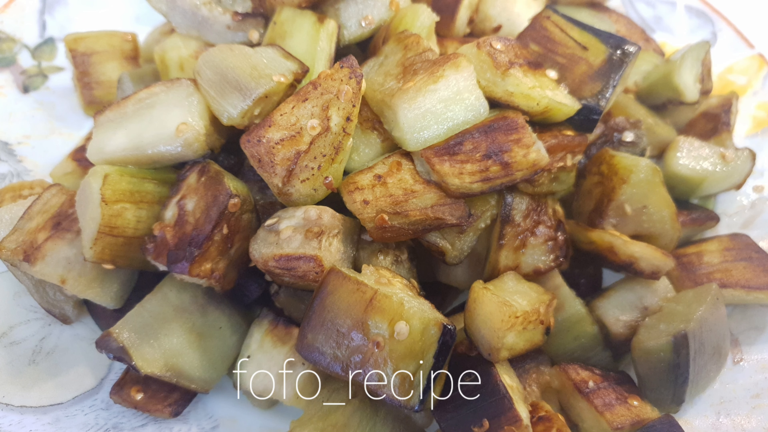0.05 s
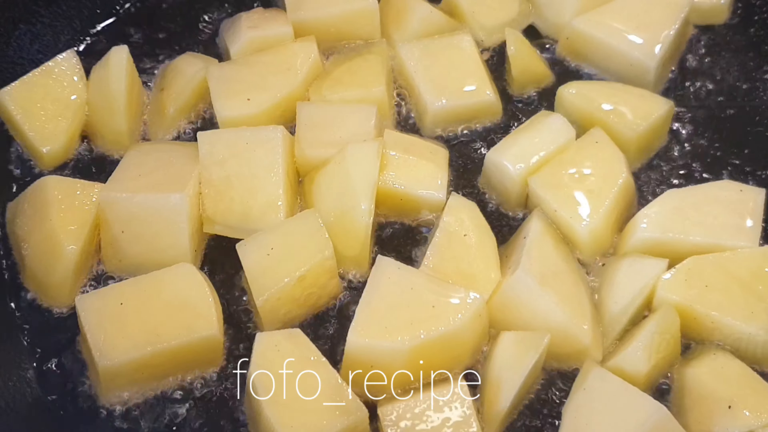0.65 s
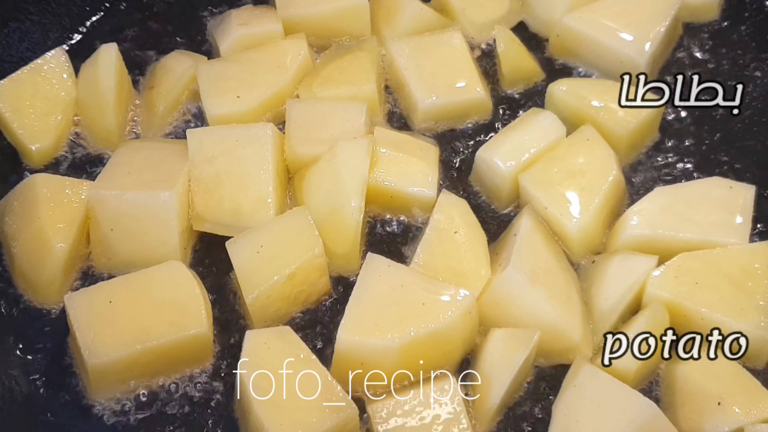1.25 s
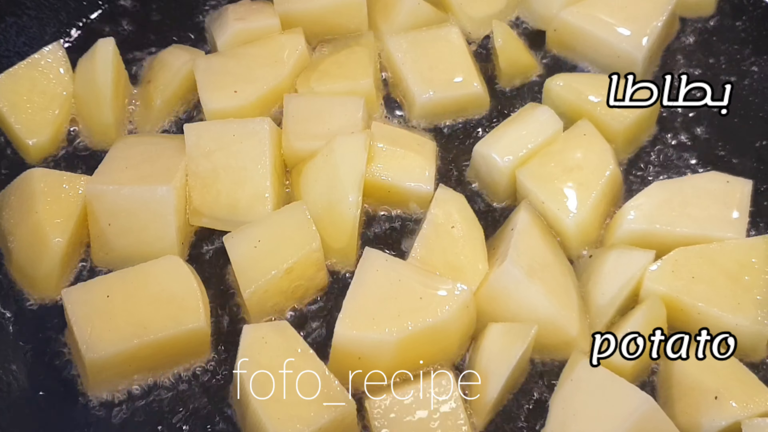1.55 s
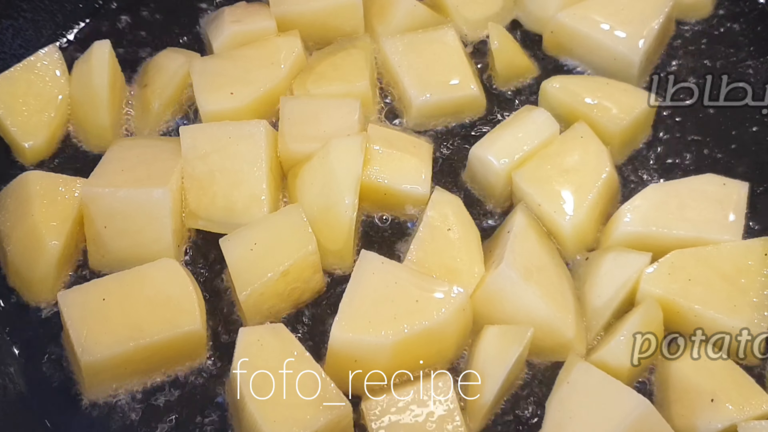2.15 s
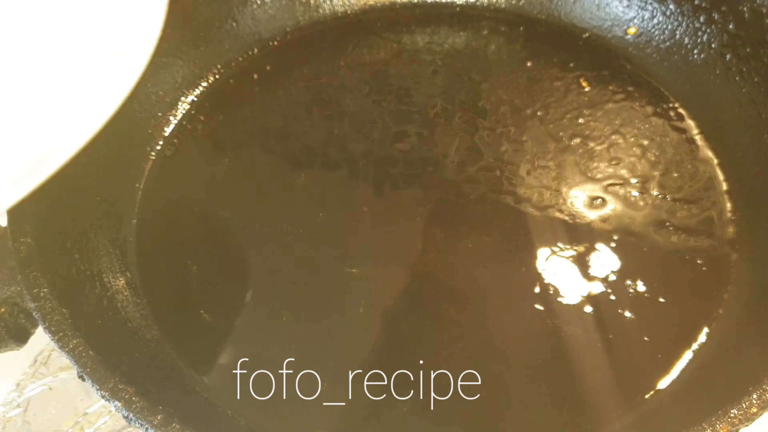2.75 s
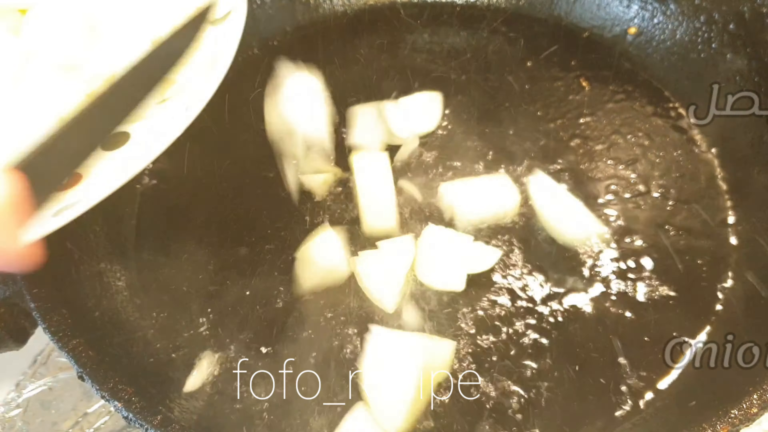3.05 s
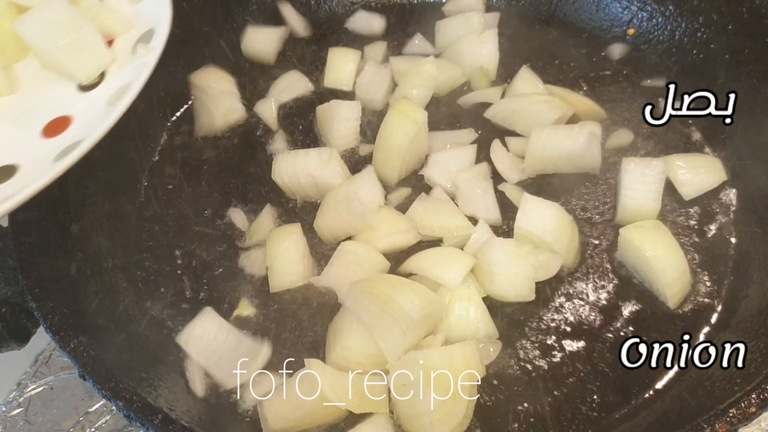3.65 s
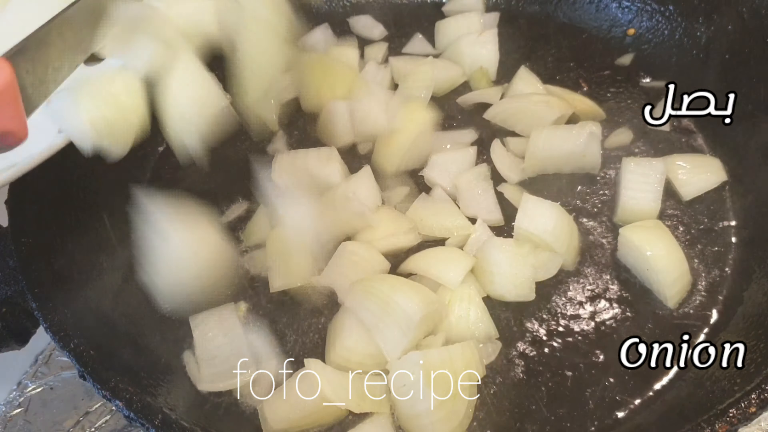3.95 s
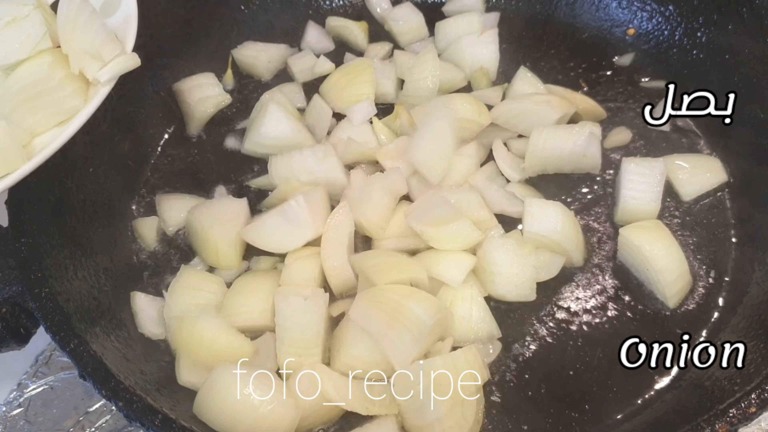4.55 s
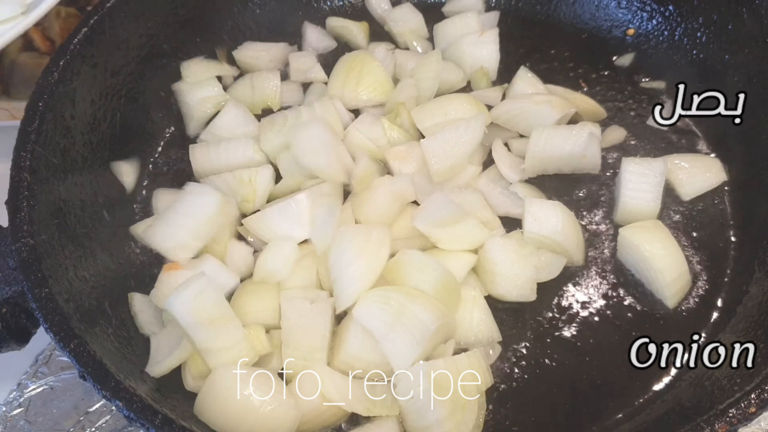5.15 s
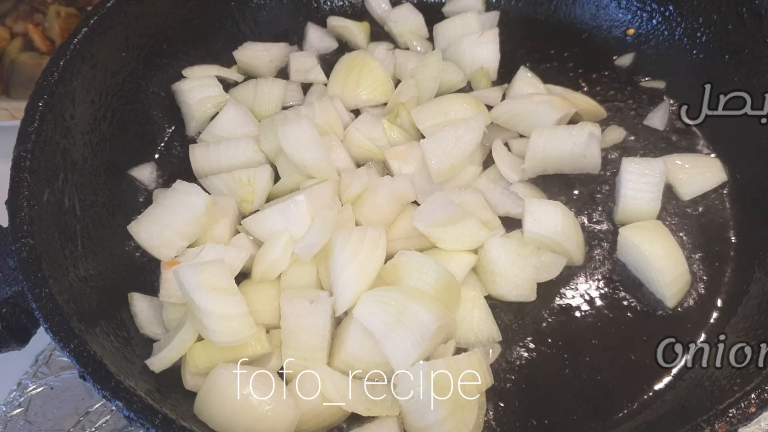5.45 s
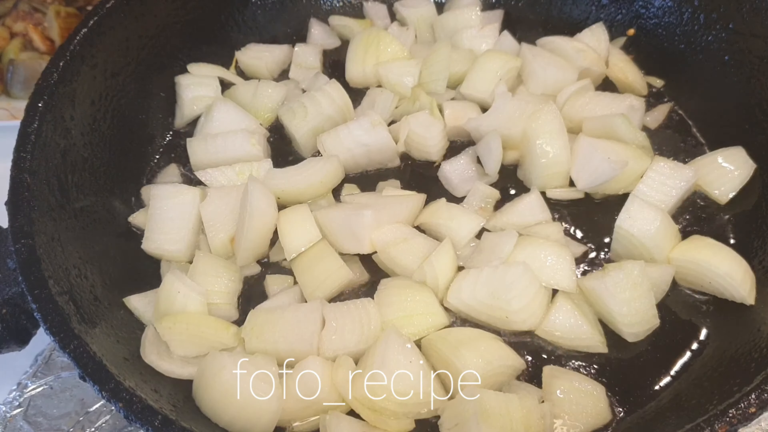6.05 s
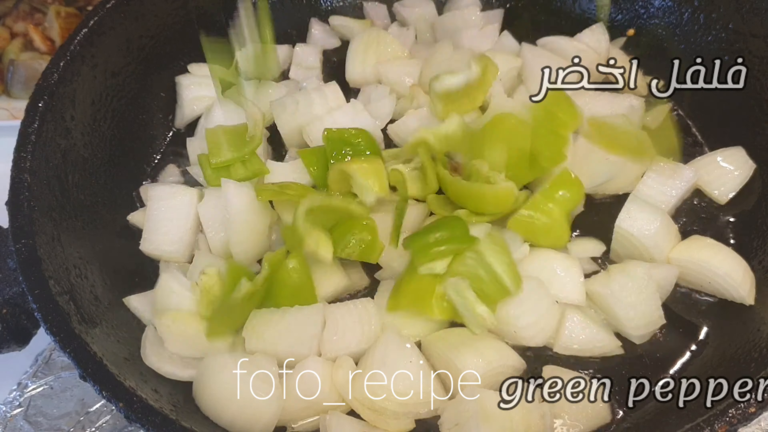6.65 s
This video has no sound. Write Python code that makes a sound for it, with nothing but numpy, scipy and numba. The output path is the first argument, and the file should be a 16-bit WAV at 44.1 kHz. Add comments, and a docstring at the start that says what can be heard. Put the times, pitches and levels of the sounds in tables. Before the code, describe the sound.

Oil crackles around potatoes over a rumbling gas burner, then flares as onions drop in, a knife taps a plate, and peppers follow.

```python
"""A frying pan on a gas stove in a small kitchen, in three abruptly cut scenes. From 0.7 s potato cubes
fizz in oil: tiny steam bubbles burst and water drops spit over the rumbling burner. From 2.8 s onions
land in the hot oil in batches, flaring and knocking; soft low thumps sound, and a knife clinks and
scrapes on the plate. From 6 s the onions fry evenly, then green peppers add a small flare."""
import sys
import numpy as np
from scipy import signal
from scipy.fft import rfft, irfft
from scipy.io import wavfile
from numba import njit

SR = 44100
rng = np.random.default_rng(int(sys.argv[2]) if len(sys.argv) > 2 else 0)


def to_wav(sig):
    """Store sig (one row per channel, or 1-D mono) as 16-bit WAV at the path in sys.argv[1].

    Samples outside -1..1 are clipped; the rate is SR.
    """
    pcm = np.clip(np.atleast_2d(sig), -1, 1) * 32767
    pcm = np.round(pcm).astype(np.int16)
    wavfile.write(sys.argv[1], SR, pcm.T)  # frames by channels


N = 304290
T = np.arange(N) / SR
FREQS_HZ = np.fft.rfftfreq(N, 1 / SR) + 1e-3

# Spectra of the hiss, the bubbles, the burner and the blade. Each row: frequency in Hz, gain in dB.
HISS_EQ = [(60, 0), (400, -4), (1000, -20), (15000, -18)]
POTATO_CRACKLE_EQ = [(700, -20), (1800, -8.5), (3400, -3), (4600, -6.5), (5700, -8), (7000, -2),
                     (8500, -7.5), (10200, -5.5), (11700, -1), (13500, -2), (15500, -9.5)]
NEAR_FIZZ_EQ = [(6000, -60), (10000, -8.5), (11700, -1.5), (13500, -2), (15500, -8)]
VEGETABLE_BOIL_EQ = [(400, -18), (1000, -11), (2200, -9.5), (3000, -4.5), (4200, -2), (5500, -2.5),
                     (7300, 1.5), (8800, -3), (10900, 0.5), (13000, -2.5), (15500, -5)]
POTATO_FLAME_EQ = [(30, -31), (58, -32), (85, -10), (125, -7.5), (205, -4), (255, -5.5), (305, -18.5),
                   (420, -11.5), (520, -10.5), (680, -14.5), (1200, -13.5), (1500, -14), (1900, -25),
                   (4000, -23)]
RUMBLE_EQ = [(20, -14), (60, -2.5), (130, 1.5), (220, -3.5), (320, -5.5), (520, -5.5), (800, -13),
             (1400, -18), (2200, -18.5), (4000, -41)]
BLADE_EQ = [(300, -2), (900, 2), (2800, 11), (3750, 18.5), (5000, 12), (9000, -9), (15000, -24.5)]
# Resonances between burner and pan. Each row: frequency in Hz, width in Hz, lift in dB.
BURNER_GAP_MODES = [(231.7, 20.5, 10.5), (353, 26, 8), (427, 21, 7.5), (509.6, 34, 8.5), (643, 20, 8.5),
                    (730, 13, 8), (857, 43, 5), (1098, 31, 8.5)]
# Loudest bubbles by the potatoes. Each row: start in seconds, level in dB, pitch in Hz.
BUBBLE_SNAPS = [(0.7986, -28, 11700), (1.1084, -22, 12700), (1.3823, -21, 13200), (1.8064, -18, 12900),
                (1.834, -17, 11400), (1.9066, -16, 11800), (1.9305, -21, 11500), (2.1889, -21, 12400),
                (2.3441, -25, 7040), (2.372, -24, 11500), (2.3984, -23, 12100), (2.422, -19, 12500),
                (2.5331, -19, 12300), (2.5676, -15.5, 11800)]
# Loudest water drops. Each row: start in seconds, level in dB, pitch in Hz.
DROP_SPITS = [(1.011, -23, 3200), (1.307, -24, 3120), (1.384, -26.5, 3000), (1.851, -19.5, 2500),
              (1.865, -19.5, 4020), (2.072, -19, 3800), (2.367, -19.5, 3500), (2.445, -20, 4200),
              (2.564, -19.5, 3040), (3.144, -10.5, 9500), (3.207, -11.5, 2600), (3.224, -13.5, 3480),
              (3.229, -17, 3000), (3.367, -15.5, 4000), (3.531, -16, 4000), (3.95, -22.5, 10700),
              (4.146, -20.5, 4020), (5.226, -16.5, 4050), (5.555, -20, 4000), (5.575, -16, 4200),
              (6.032, -17, 6550), (6.163, -19, 5000), (6.783, -17, 9000)]
# Batches entering the oil. Each row: start in seconds, landing time in seconds, flare in dB, boil in dB.
ONION_LANDINGS = [(2.985, .06, -27, -43), (3.47, 0.13, -29.5, -36.5), (4.05, 0.07, -41, -42),
                  (5.05, 0.22, -35, -44)]
PEPPER_LANDINGS = [(6.47, 0.05, -39, -54)]
# Low rumble that ducks as the sizzle flares, then slowly recovers. Each row: time in seconds, level in dB.
RUMBLE_LEVELS = [(2.98, -37.5), (3.15, -45), (3.9, -49), (4.8, -48.5), (6.0, -45)]
# Soft low thumps. Each row: start in seconds, level in dB, pitch in Hz, left minus right in dB.
LOW_THUMPS = [(3.095, -32, 69, 11), (3.239, -30, 70, 2), (3.355, -26.5, 110, -18), (3.74, -23.5, 55.6, -30),
              (4.437, -35, 54.6, 10), (5.309, -28, 129, -16), (5.62, -32.5, 49.4, -15)]
# Onion hitting the pan. Each row: start in seconds, peak in dB, left minus right in dB.
ONION_KNOCKS = [(3.241, -25, 1), (3.738, -18, -11), (4.533, -21, 6), (5.033, -21, 2), (5.0711, -12.5, 1)]
# Modes of a knock and of the plate. Each row: frequency in Hz, relative level in dB, t60 in seconds.
TICK_MODES = [(870, -30, 0.011), (1300, 1, .009), (1670, 2, .008), (3100, -12, 0.0025), (4700, 5.5, 0.0047),
              (6560, 10.5, 0.0048)]
PLATE_MODES = [(1750, -5.5, .16), (2939, 2, .1), (3750, -13, .06), (5534, -3, .06)]
# Knife on plate. Each row: start in seconds, ring gain in dB, scrape gain in dB, rim place in radians.
KNIFE_STROKES = [(4.34, -44, -52, .6), (4.705, -35.5, -48, .7), (4.937, -27, -39, .68),
                 (5.3205, -26.5, -39, .28), (5.365, -39, -45, .3), (5.62, -46, -33, 1),
                 (5.642, -48, -39, 1)]


def undb(db):
    """Decibels to gain."""
    return 10 ** (np.asarray(db) / 20)


def unit(x):
    """Scale a stereo pair to a centre rms of 1."""
    return x / np.std(x.mean(0))


def pan(db):
    """Stereo gains with mean 1 for a left minus right level."""
    gains = undb(np.array([[db], [-db]]) / 2)
    return gains / gains.mean()


def colour(x, points, modes=()):
    """Filter by an outline plus resonances; 12 dB per octave roll-off below the first point."""
    hz, db = np.transpose(points)
    shape_db = np.interp(np.log(FREQS_HZ), np.log(hz), db)
    shape_db -= 12 * np.maximum(np.log2(hz[0] / FREQS_HZ), 0)
    for centre_hz, width_hz, lift_db in modes:
        shape_db += lift_db / (1 + (2 * (FREQS_HZ - centre_hz) / width_hz) ** 2)
    return irfft(rfft(x) * undb(shape_db), N)


def add(out, start_s, sound):
    """Mix in a short sound."""
    i = int(start_s * SR)
    out[:, i:i + sound.shape[-1]] += sound[..., :N - i]


def fade(t, t60_s):
    """Exponential decay."""
    return np.exp(-np.log(1000) * t / t60_s)


def walk(rate_hz):
    """Random wander, spread near 1."""
    knots = rng.standard_normal(1024)
    return np.interp(T * rate_hz, np.arange(len(knots)), knots)


def ramp(start_s, length_s):
    """Linear rise from 0 to 1."""
    return np.clip((T - start_s) / length_s, 0, 1)


def cut(start_s, end_s, open_at_s, opening_s, muted_db):
    """Scene gate: starts muted, opens, shuts abruptly."""
    running = np.clip(np.minimum((T - start_s) / .004, (end_s - T) / .008), 0, 1)
    return running * np.interp(T, [open_at_s, open_at_s + opening_s], [undb(muted_db), 1])


def hiss(start_s=.652, level_db=-76.5):
    """Very faint, dull hiss under all scenes."""
    return unit(colour(rng.standard_normal((2, N)), HISS_EQ)) * undb(level_db) * (T > start_s)


@njit
def bursts(start_samples, hz, tau_samples, size):
    """One damped sine per bubble, of unit energy before scaling by size."""
    out = np.zeros(N)
    for k, start in enumerate(start_samples):
        pole = np.exp(2j * np.pi * hz[k] / SR - 1 / tau_samples[k])
        phasor = 2 * size[k] / np.sqrt(tau_samples[k]) + 0j
        for i in range(max(int(start), 0), min(int(start + 6 * tau_samples[k]) + 2, N)):
            out[i] += phasor.imag
            phasor *= pole
    return out


def bubbles(per_s, spread_db, cycles, pan_db, pan_spread_db, ceiling_db):
    """Steam bubbles burst all over the pan: many small, few large, each with its own pitch and place."""
    draws = np.random.default_rng(rng.integers(2 ** 31)).random((int(per_s * N / SR), 6))
    when, pitch, strength, damping, place, side = draws.T
    hz = 500 + 15500 * pitch
    tau_samples = cycles * (.4 - .82 * np.log(1 - damping)) * SR / hz  # most click, a few sing
    size = undb(np.minimum(-spread_db * np.log(1 - strength), ceiling_db))
    lag_samples = 24 * (place - .5)
    lean_db = pan_db + pan_spread_db * (2 * side - 1)
    ears = [bursts(when * N + ear * lag_samples, hz, tau_samples, size * undb(ear * lean_db / 2))
            for ear in (1, -1)]
    return unit(np.array(ears))


def scatter(x, wet_db, t60_s):
    """Each bubble has its own echoes; together they form a hiss trailing the crackle."""
    pole = np.exp(-np.log(1e6) / (t60_s * SR))
    energy = signal.lfilter([1 - pole], [1, -pole], x ** 2)
    return x + undb(wet_db) * np.sqrt(energy) * rng.standard_normal((2, N))


def burner(points, modes, width_hz, flutter_db, pan_db):
    """Turbulent gas flame: low notes are centred, the deepest draughts and the highs are wide."""
    mid, side = rng.standard_normal((2, N))
    side_gain = np.clip(.052 + FREQS_HZ / width_hz + (38 / FREQS_HZ) ** 2, 0, 1)
    side = irfft(rfft(side) * side_gain, N)
    flame = colour(np.array([mid + side, mid - side]), points, modes)
    return unit(flame * pan(pan_db)) * undb(flutter_db * walk(6.94))


def pop(hz, pan_db, cycles=.83):
    """A water drop bursts in oil: brief cavity ring, sharp crack, splutter of droplets."""
    t = T[:SR // 25]
    cavity = np.sin(2 * np.pi * hz * t) * np.exp(-t * hz / cycles)
    crack, splutter = .83 * fade(t, .0087), .31 * fade(t, .037)
    spray = rng.standard_normal((2, len(t))) * (crack + splutter)
    band = signal.butter(1, [hz / 3, min(2 * hz, .4 * SR)], "band", fs=SR)
    sound = cavity + signal.lfilter(*band, spray)
    return sound / np.abs(sound).max() * pan(pan_db)


def strays(per_s, peak_db, spread_db=3.5, centre_hz=5000, spread_octaves=.59, pan_spread_db=5.5):
    """Small drops spit at random; peak_db is relative to a sizzle of rms 1."""
    out = np.zeros((2, N))
    draws = np.random.default_rng(rng.integers(2 ** 31)).uniform(-1, 1, (int(per_s * N / SR), 4))
    for when, size, pitch, side in draws:
        drop = pop(centre_hz * 2 ** (spread_octaves * pitch), pan_spread_db * side)
        add(out, (when + 1) / 2 * N / SR, undb(peak_db + spread_db * size) * drop)
    return out


def potatoes():
    """Sparse crackle and fine fizz from the nearest cubes over a strong flame; the levels rise once."""
    sizzle_db = -40.5 + 3 * ramp(start_s=2.03, length_s=.36)
    flame_db = -43 + 4 * ramp(start_s=1.4, length_s=.6)
    crackle = bubbles(per_s=4000, spread_db=4.8, cycles=.71, pan_db=1, pan_spread_db=8, ceiling_db=25)
    crackle = unit(colour(scatter(crackle, wet_db=5.5, t60_s=.096), POTATO_CRACKLE_EQ))
    fizz = bubbles(per_s=3200, spread_db=4.5, cycles=3.3, pan_db=15, pan_spread_db=3, ceiling_db=14.5)
    fizz = unit(colour(scatter(fizz, wet_db=-17, t60_s=.1), NEAR_FIZZ_EQ))
    fizz_db = -1.5 + .27 * (sizzle_db + 38.5) + .6 * walk(30.6)  # livelier boil, more fizz
    sizzle = undb(-1.17) * crackle + undb(fizz_db) * fizz + strays(per_s=9, peak_db=10.5)
    sizzle *= undb(sizzle_db + 1.1 * walk(45.2))
    flame = burner(POTATO_FLAME_EQ, BURNER_GAP_MODES, width_hz=4700, flutter_db=1, pan_db=1.1)
    return sizzle + flame * undb(flame_db)


def snaps(cycles=2.4, pan_db=14):
    """A tiny bubble opens; its cavity sings for a few cycles in the high treble."""
    out, t = np.zeros((2, N)), T[:SR // 100]
    for start_s, db, hz in BUBBLE_SNAPS:
        age = t * hz / cycles
        envelope = age * np.exp(1 - age)
        add(out, start_s, undb(db) * envelope * np.sin(2 * np.pi * hz * t) * pan(pan_db))
    return out


def spits():
    """Large drops burst above the sizzle."""
    out = np.zeros((2, N))
    for start_s, db, hz in DROP_SPITS:
        add(out, start_s, undb(db) * pop(hz, pan_db=5.5 * rng.uniform(-1.1, 1)))
    return out


def boil_power(batches, flare_tau_s=.19, drying_tau_s=7.9):
    """Sizzle power builds as a batch lands, flares as surface water flashes off, then falls as it dries."""
    power = 1e-9
    for start_s, landing_s, flare_db, boil_db in batches:
        age_s = np.maximum(T - start_s - landing_s, 0)
        flare = undb(flare_db) ** 2 * np.exp(-age_s / flare_tau_s)
        boil = undb(boil_db) ** 2 * np.exp(-age_s / drying_tau_s)
        power += ramp(start_s, landing_s) ** 2 * (flare + boil)
    return power


def vegetables(power, rumble_db, per_s, spread_db, pan_db, surge_db, spray_db, spray_slope):
    """Wet pieces boil over a low rumble; a fiercer boil has a larger share of fine spray."""
    boil = bubbles(per_s, spread_db, cycles=.8, pan_db=pan_db, pan_spread_db=4, ceiling_db=20)
    boil = colour(scatter(boil, wet_db=1, t60_s=.082), VEGETABLE_BOIL_EQ)
    spray = irfft(rfft(boil) / (1 + (9500 / FREQS_HZ) ** 8), N)  # high-pass
    share = np.clip(undb(spray_db) ** 2 * (power / power.max()) ** spray_slope, 0, .8)
    sizzle = unit(boil - spray) * np.sqrt(1 - share) + unit(spray) * np.sqrt(share)
    sizzle += strays(per_s=4, peak_db=10)
    rumble = burner(RUMBLE_EQ, (), width_hz=2400, flutter_db=-.4, pan_db=1.5)
    return sizzle * np.sqrt(power) * undb(surge_db * walk(30)) + rumble * undb(rumble_db)


def onions(bare_oil_db=-42):
    """Onions slide into hissing hot oil in batches."""
    power = undb(bare_oil_db) ** 2 + boil_power(ONION_LANDINGS)
    rumble_db = np.interp(T, *np.transpose(RUMBLE_LEVELS))
    return vegetables(power, rumble_db, per_s=10000, spread_db=3.5, pan_db=2,
                      surge_db=.26, spray_db=-2, spray_slope=.13)


def thumps(cycles=.38, attack_s=.00015):
    """Soft low thumps, as of air puffs: a short, heavily damped swing."""
    out, t = np.zeros((2, N)), T[:SR // 8]
    for start_s, db, hz, pan_db in LOW_THUMPS:
        envelope = np.exp(-t * hz / cycles) * (1 - np.exp(-t / attack_s))
        add(out, start_s, undb(db) * envelope * np.cos(2 * np.pi * hz * t) * pan(pan_db))
    return out


def ringing(modes):
    """A struck object: one decaying sine per mode."""
    t = T[:SR // 3]
    return sum(undb(db) * np.sin(2 * np.pi * hz * t) * fade(t, t60_s) for hz, db, t60_s in modes)


def knocks():
    """Firm pieces hit the pan with a dry tick."""
    out, tick = np.zeros((2, N)), ringing(TICK_MODES)
    tick /= np.abs(tick).max()
    for start_s, db, pan_db in ONION_KNOCKS:
        add(out, start_s, tick * undb(db) * pan(pan_db))
    return out


def knife(detune=1.022):
    """The blade taps and scrapes the plate, whose modes ring as beating pairs."""
    rings, scrapes, t = np.zeros((2, N)), np.zeros((2, N)), T[:SR // 3]
    for start_s, ring_db, scrape_db, place_rad in KNIFE_STROKES:
        for order, (hz, db, t60_s) in enumerate(PLATE_MODES, 1):
            pair = ringing([(hz, db, t60_s), (hz * detune, db - 6, t60_s / 2)])
            coupling = np.cos(order * place_rad)  # weak near a node
            add(rings, start_s, undb(ring_db) * coupling * pair * pan(4))
        add(scrapes, start_s, undb(scrape_db) * rng.standard_normal((2, len(t))) * fade(t, .15))
    return rings + colour(scrapes, BLADE_EQ)


def peppers(soft_onions_db=-33):
    """Peppers add a small flare to evenly frying onions."""
    power = undb(soft_onions_db) ** 2 + boil_power(PEPPER_LANDINGS)
    return vegetables(power, rumble_db=-43.5, per_s=15000, spread_db=3.3, pan_db=1.5,
                      surge_db=1.14, spray_db=-3, spray_slope=.15)


def kitchen(x, wet_db, t60_s):
    """Pan wall, hob and tiles add a short tail, different on each side."""
    t = T[:SR // 3]
    tail = rng.standard_normal((2, len(t))) * fade(t, t60_s) * (t > .001)
    tail /= np.sqrt(np.sum(tail ** 2, axis=1, keepdims=True))
    return x + undb(wet_db) * signal.fftconvolve(x, tail, axes=1)[:, :N]


def scene():
    """Three gated scenes in turn, plus single sounds and hiss."""
    singles = kitchen(snaps() + spits() + knocks(), wet_db=-7, t60_s=.088)
    clinks = kitchen(undb(-.6) * knife(), wet_db=-12, t60_s=.11)
    frying = potatoes() * cut(start_s=.672, end_s=2.756, open_at_s=.672, opening_s=.115, muted_db=-27)
    frying += onions() * cut(start_s=2.792, end_s=6.047, open_at_s=2.838, opening_s=.085, muted_db=-22)
    frying += peppers() * cut(start_s=6.041, end_s=7, open_at_s=6.122, opening_s=.022, muted_db=-7.5)
    return frying + thumps() + singles + clinks + hiss()


def record(dry, top_hz=15750):
    """Steep low-pass."""
    return signal.sosfilt(signal.ellip(10, .1, 80, top_hz, fs=SR, output="sos"), dry)


dry = scene()
out = record(dry)
to_wav(out)
```